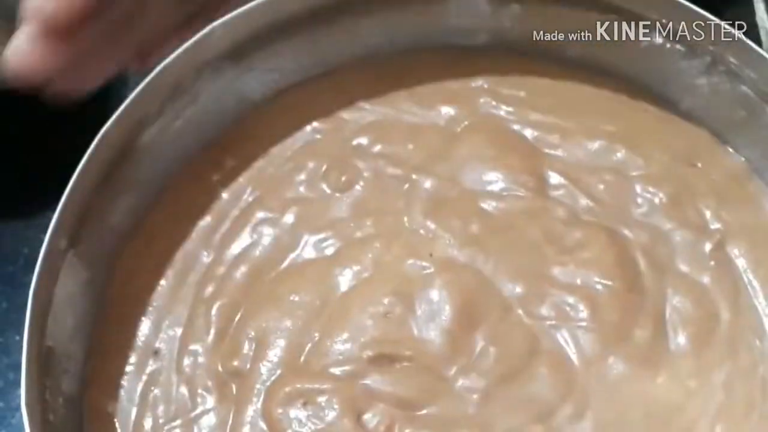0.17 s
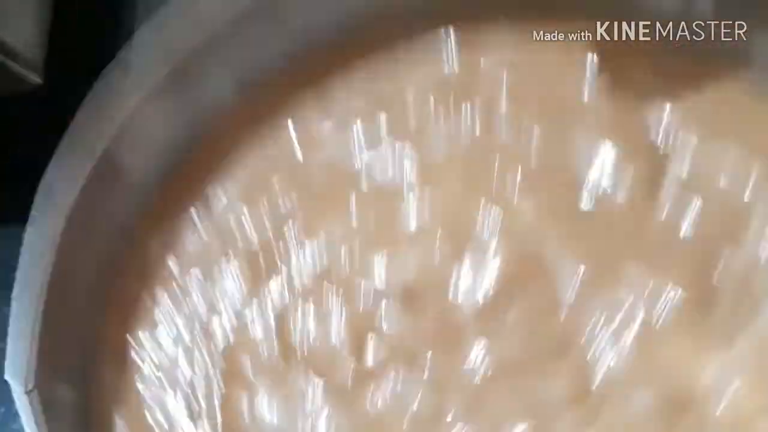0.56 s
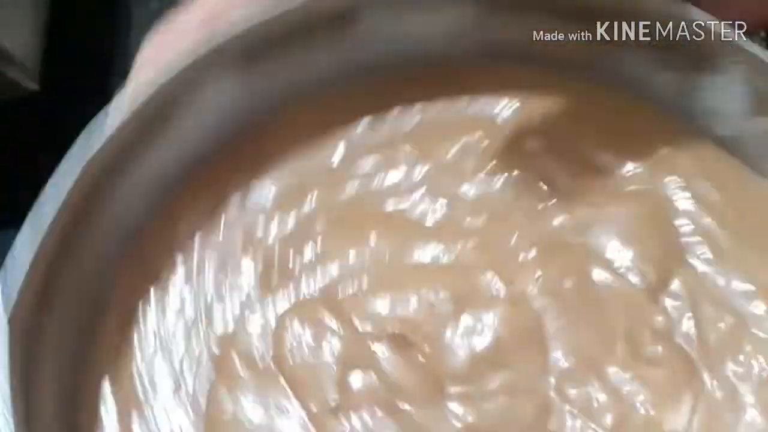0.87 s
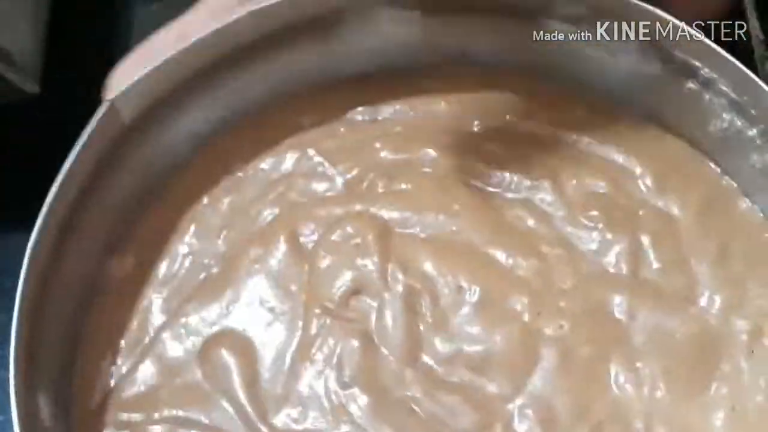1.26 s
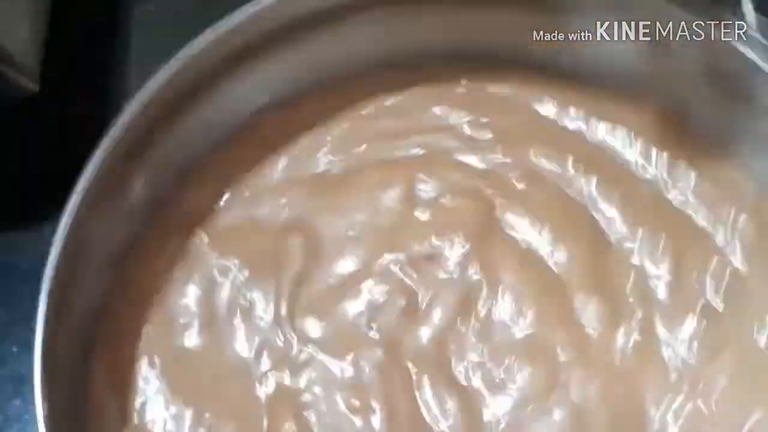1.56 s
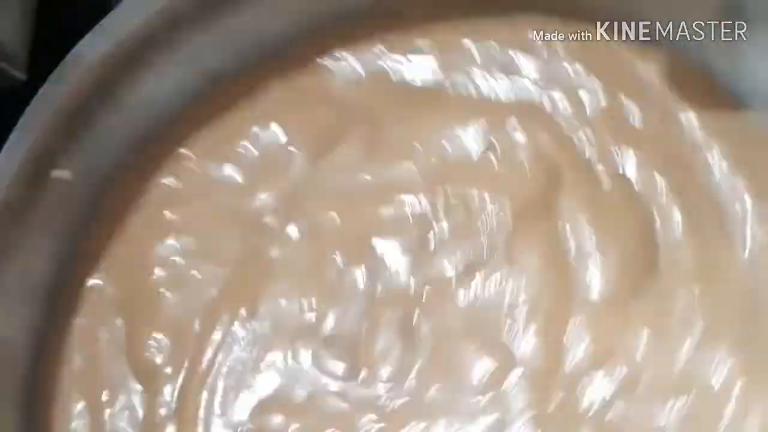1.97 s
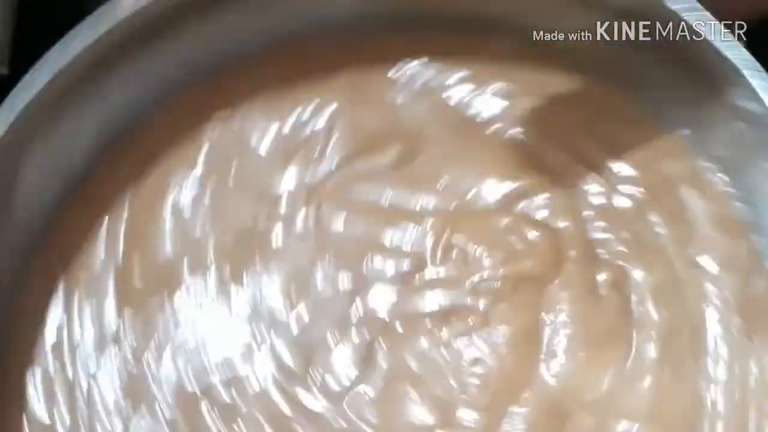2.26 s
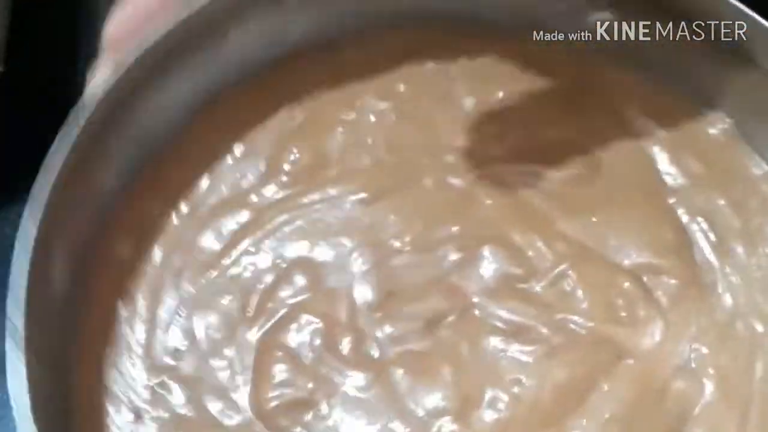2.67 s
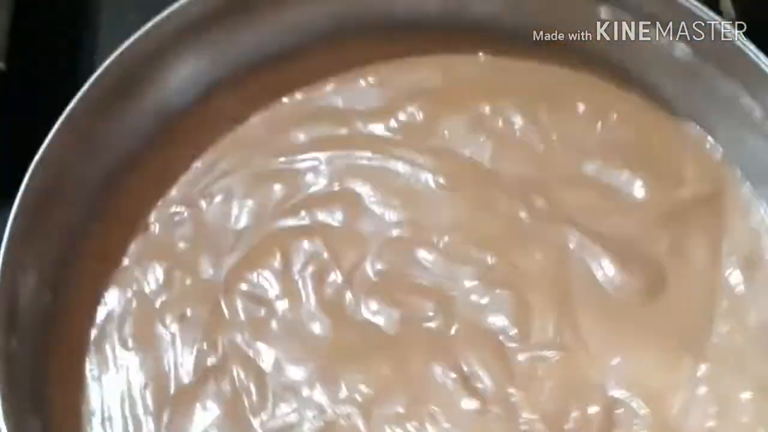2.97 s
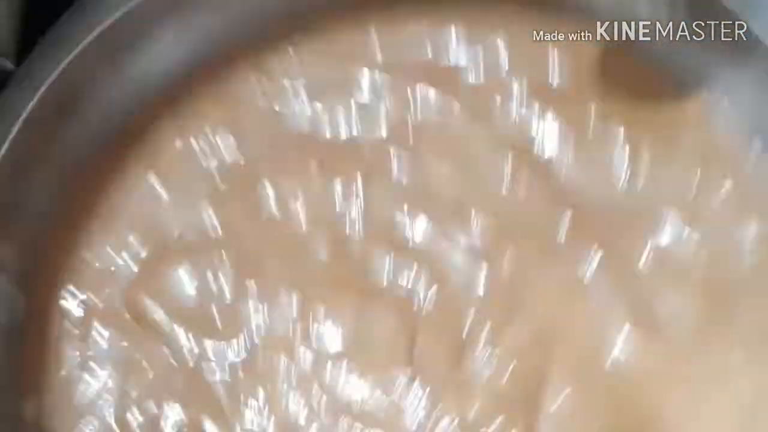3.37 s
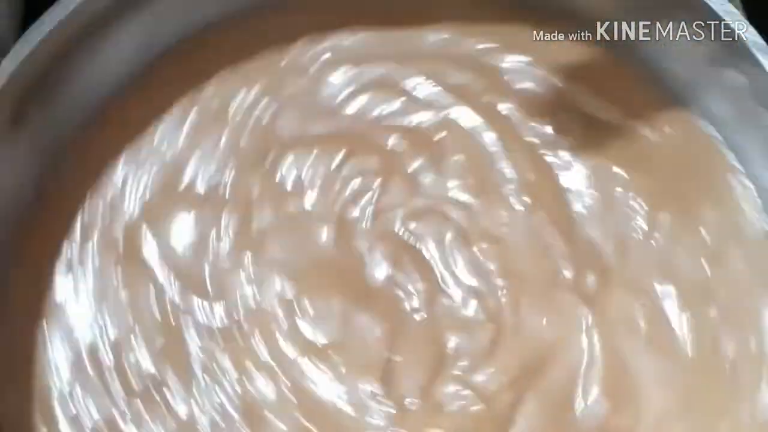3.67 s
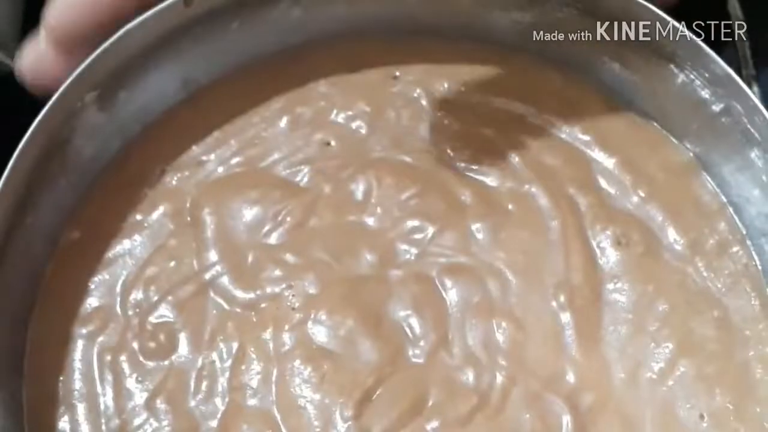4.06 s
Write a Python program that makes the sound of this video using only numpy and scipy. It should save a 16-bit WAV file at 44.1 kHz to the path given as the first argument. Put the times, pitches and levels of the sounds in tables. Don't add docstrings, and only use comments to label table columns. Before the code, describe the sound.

Close up, a steel pan full of batter is dropped on a hard counter eight times, roughly twice a second. Each drop starts with a sharp metallic clack and very short ring, then the heavy base slaps down and rocks in a few dull, low thuds. Small faint crackles come as the pan is lifted. The small, hard kitchen rings on briefly over a very quiet low murmur.

```python
import sys
import numpy as np
from scipy import signal
from scipy.fft import rfft, irfft
from scipy.io import wavfile
from scipy.ndimage import uniform_filter1d

SR = 44100
rng = np.random.default_rng(int(sys.argv[2]) if len(sys.argv) > 2 else 0)


def ratio(d):
    e = np.asarray(d, float) / 20
    return 10 ** e


def put_to_file(sound):
    columns = np.atleast_2d(sound).T
    safe = np.clip(columns, -1, 1)
    whole_steps = np.round(safe * 32767)
    wavfile.write(sys.argv[1], SR, whole_steps.astype(np.int16))


N = 186123
AGE = np.arange(4096) / SR

# [f/Hz, level/dB]
MURMUR_COLOUR = [(15, -46.5), (25, -25), (87, -9), (124, -15), (349, -9.5), (433, -2.5), (524, -16),
                 (878, -19), (1120, -18.5), (4360, -34.5), (7600, -33.5), (8800, -31.5), (14800, -46),
                 (16500, -68)]
MURMUR_DB = -54.5

# [t/s, level/dB, length/s]
LIFTS = [(0.0505, -26.5, 0.01), (0.49, -32, 0.005), (0.533, -30, 0.005), (0.642, -27, 0.0093),
         (1.1192, -24.5, 0.0058), (1.589, -24, 0.0068), (2.03, -31, 0.0055), (2.477, -28.5, 0.0061),
         (2.94, -30.5, 0.0089), (2.956, -34.5, 0.0058), (3.41, -38.5, 0.007)]
# [f/Hz, level/dB]
PEEL_COLOUR = [(1500, -10.5), (3500, 0), (5000, -4.5), (8000, -0.5), (11000, -7.5), (16000, -27)]

# [f/Hz, level/dB, t60/s]
ROOM_RINGING = [(39.5, -62.5, 0.2), (85.9, -20, 0.77), (155.5, -38, 0.44), (228, -18.5, 0.74),
                (334, -30.5, 0.5), (450, -30, 0.68), (657, -28, 0.55), (1140, -17.5, 0.51),
                (2160, -23, 0.58), (3120, -24.5, 0.56), (3800, -23, 0.39), (4660, -25.5, 0.62),
                (8600, -22.5, 0.44), (14840, -23, 0.31)]
# [f/Hz, level/dB, t60/s]
COUNTER_TONES = [(138.3, -43.5, 0.49), (211.8, -32, 0.23), (240, -33, 0.28), (387, -36, 0.28),
                 (445, -32.5, 0.36), (586, -34.5, 0.32), (677, -37, 0.2), (972, -29, 0.28),
                 (1400, -25, 0.095)]
# [f/Hz, rise/s]
BUILD_UP = [(200, 0.0017), (1500, 0.0045), (8000, 0.0067)]
# [f/Hz, level/dB]
THUD_PUSH = [(40, -13.5), (100, -16.5), (170, -6), (230, -1.5), (330, 2.5), (450, -4.5), (600, -8.5),
             (900, -18), (3000, -48)]
# [f/Hz, level/dB]
UPPER_TONE_PUSH = [(1000, -29.5), (1900, -2.5), (2400, 0), (3300, -2.5), (4500, -26)]

# [t/s, level/dB, f/Hz]
ROCKS = [(0.056, -32.5, 360), (0.075, -30, 304), (0.438, -24, 270), (0.488, -16, 280), (0.51, -16, 349),
         (0.52, -13, 357), (0.531, -17, 240), (0.932, -6.5, 316), (0.943, -20, 320), (0.967, -12.5, 301),
         (1.125, -24.5, 254), (1.397, -6, 268), (1.447, -15.5, 378), (1.847, -3, 252), (2.292, -5, 299),
         (2.758, -9.5, 293), (2.789, -9, 275), (2.802, -14, 257), (2.84, -19.5, 290), (2.955, -21.5, 304),
         (3.231, -12, 266), (3.249, -19, 277), (3.278, -24.5, 420), (3.703, -18.5, 276)]
# [t/s, wall ring level/dB, wall ring f/Hz, thud level/dB, thud f/Hz]
REBOUNDS = [(0.0640, -43, 1000, -22.5, 293), (0.0839, -44, 1030, -24.5, 309),
            (0.414, -25.5, 1910, 2, 283.4), (0.432, -34, 2220, -9.5, 430), (0.463, -25.5, 1500, -9, 278),
            (0.4990, -21.5, 1280, -13, 326), (0.9180, -21.5, 1350, -6.5, 279),
            (0.9238, -25.5, 1006, -25, 286), (1.3830, -19, 994, -6.5, 392), (1.4020, -28, 1120, -6.5, 294),
            (1.4270, -33.5, 2260, -17, 362), (1.8391, -17.5, 1480, -7.5, 292),
            (1.8654, -45, 810, -12.5, 331), (1.8955, -31, 1015, -9, 314), (2.2801, -19, 972, -6, 233),
            (2.3137, -41.5, 1890, -11, 313), (2.3271, -36.5, 1960, -13.5, 378),
            (2.7387, -20, 950, -2.5, 257), (2.7700, -32, 1060, -21, 310), (3.2079, -20, 1280, -4, 366),
            (3.2236, -26, 1470, -12, 288), (3.261, -30.5, 1070, -13, 329), (3.6606, -22, 1500, -9.5, 369),
            (3.6820, -27.5, 1400, -10.5, 304)]
# [t/s, wall ring level/dB, wall ring f/Hz, upper tone level/dB, thud level/dB]
LANDINGS = [
    (0.4079, -16, 1400, -15, -5.5),
    (0.8889, -20.5, 1715, -13.5, -4.5),
    (1.3701, -13.5, 1480, -12.5, -8),
    (1.8162, -18.5, 1315, -41, -5),
    (2.2611, -20.5, 1490, -10.5, -6.5),
    (2.7127, -15, 1564, -10, -3),
    (3.1973, -18, 1540, -20, -1),
    (3.6437, -14.5, 1475, -16.5, -4.5),
]
LANDING_THUD_HZ, LANDING_T60_S, LANDING_T60_GAIN_PER_DB = 333.4, 0.018, 0.23
THUD_T60_S = 0.053

# [f/Hz, level/dB]
CRACK_COLOUR = [(2000, -2.5), (3500, -1.5), (5000, -9.5), (7000, -5.5), (8800, -3.5), (10500, -8.5),
                (13000, -18), (16000, -33)]
# [f/Hz, level/dB]
KNOCK_COLOUR = [(250, -33.5), (600, -2.5), (1000, -1.5), (1500, 1), (2200, -5.5), (3200, -12),
                (4000, -15.5), (8000, -29)]
# [f/Hz, level against the stronger ring/dB]
HIGH_TONES = [(2950, -1.5), (3620, -5.5)]
UPPER_TONE_HZ = 2197
RING_T60_S, CRACK_T60_S = 0.012, 0.016
RING_LAG_S, CRACK_LAG_S = 0.000837, 0.0006
HARD_REBOUND_DB, HARD_CRACK_DB, CRACK_GROWTH = -20, -15.5, 1.47
SECOND_TONE_HZ, SECOND_SCATTER, SECOND_TONE_DB = 1750, 0.08, -26.5

# [f/Hz, level/dB]
MIC_COLOUR = [(20, -32.5), (60, -5), (150, 0), (2200, 1), (3250, 0.5), (3700, 0), (6500, -0.5),
              (8000, -2.5), (8900, -0.5), (9500, -7), (12000, 0.5)]
TOP_HZ, CEILING = 15500, 0.97


def fade(t, t60):
    return np.exp(-np.log(1000) * t / np.maximum(t60, 1e-3))


def colour(x, points):
    hz, db = np.transpose(points)
    f = np.maximum(np.fft.rfftfreq(8192, 1 / SR), 1)
    level_db = np.interp(np.log(f), np.log(hz), db)
    cepstrum = irfft(np.log(ratio(level_db)))
    cepstrum[1:4096] *= 2
    response = irfft(np.exp(rfft(cepstrum[:4096], 8192)))
    return signal.fftconvolve(x, response)[:len(x)]


def add(out, s, sound):
    i = int(s * SR)
    out[i:i + len(sound)] += sound[:N - i]


def grow(push_s):
    return 1 - np.exp(-AGE / push_s)


def ring(hz, t60, push_s):
    return np.sin(2 * np.pi * hz * AGE) * fade(AGE, t60) * grow(push_s)


def kitchen():
    noise = colour(rng.standard_normal(N), MURMUR_COLOUR)
    k = SR // 6
    steps = np.repeat(rng.standard_normal(N // k + 1), k)
    swell_db = 0.8 * uniform_filter1d(steps, k)[:N]
    return noise / noise.std() * ratio(MURMUR_DB + swell_db)


def peel():
    out = np.zeros(N)
    for s, db, length in LIFTS:
        chance = rng.standard_normal((2, len(AGE)))
        snaps = chance[0] * ratio(0.72 * chance[1]) * grow(0.0011)
        add(out, s, ratio(db - 5) * snaps * np.exp(-(AGE / max(length, 1e-3)) ** 2))
    return colour(out, [(300, -17)] + PEEL_COLOUR)


def blows(s, gain, points):
    shoves = np.zeros(N)
    sign = rng.choice([-1, 1], len(s))
    np.add.at(shoves, (np.asarray(s) * SR).astype(int), gain * sign)
    return colour(shoves, points)


def shaking():
    s, crack_db, low_db, _, up_db, _ = np.transpose(rim_contacts())
    thud_s, thud_db = np.transpose(thuds())[:2]
    lift_s, lift_db = np.transpose(LIFTS)[:2]
    force = blows(s, ratio(crack_db + 16.5), [(300, -65.5)] + CRACK_COLOUR)
    force += blows(s, ratio(28) * np.hypot(ratio(low_db), ratio(up_db)), KNOCK_COLOUR)
    force += colour(blows(s, ratio(up_db + 25.5), UPPER_TONE_PUSH), UPPER_TONE_PUSH)
    force += blows(lift_s, ratio(lift_db + 7.5), [(300, -38.5)] + PEEL_COLOUR)
    return force + blows(thud_s, ratio(thud_db + 34.5), THUD_PUSH)


def surroundings(force):
    t = np.arange(SR) / SR
    hz, db, t60 = np.transpose(ROOM_RINGING)
    rise_hz, rise_s = np.transpose(BUILD_UP)
    noise = rfft(rng.standard_normal(SR))
    octave = np.log2(np.maximum(np.arange(len(noise)), 1))
    response = np.zeros(SR)
    for centre in np.arange(5, 14.6, 0.5):
        band = irfft(noise * np.maximum(1 - 2 * abs(octave - centre), 0), SR)
        gain_db = np.interp(centre, np.log2(hz), db)
        decay_s = np.interp(centre, np.log2(hz), t60)
        rise = np.interp(centre, np.log2(rise_hz), rise_s)
        build_up = 1 - np.exp(-(t / rise) ** 1.1)
        response += ratio(gain_db - 11) * band * fade(t, decay_s) * build_up
    for f, level_db, ring_s in COUNTER_TONES:
        response += ratio(level_db - 18.5) * np.sin(2 * np.pi * f * t) * fade(t, ring_s)
    return signal.fftconvolve(force, response)[:N]


def thuds():
    first = [(s, db, LANDING_THUD_HZ, LANDING_T60_S * (1 - LANDING_T60_GAIN_PER_DB * db))
             for s, *_, db in LANDINGS]
    later = [(s, db, hz) for s, _, _, db, hz in REBOUNDS] + ROCKS
    return first + [(s, db, hz, THUD_T60_S) for s, db, hz in later]


def base():
    out = np.zeros(N)
    for s, db, hz, t60 in thuds():
        thud = -ring(hz, 3.6 * t60, push_s=0.0027)
        thud += ratio(-7.5) * ring(1.46 * hz, 0.39 * t60, push_s=0.0015)
        thud += ratio(-14.5) * ring(2.08 * hz, 0.69 * t60, push_s=0.00056)
        thud *= np.exp(-(AGE / (0.2 * t60)) ** 2)
        thud += ratio(-31) * ring(75, 0.045, push_s=0.006)
        add(out, s + 0.00072, ratio(db + 1.5) * thud)
    return out


def slap():
    out = np.zeros(N)
    for s, db, _, t60 in thuds():
        sizzle = rng.standard_normal(len(AGE)) * fade(AGE, t60) * grow(0.002)
        add(out, s, ratio(0.88 * db - 20) * sizzle)
    return colour(out, [(300, -54)] + CRACK_COLOUR)


def rim_contacts():
    contacts = []
    for s, db, hz, up_db, _ in LANDINGS:
        crack_db = 20 * np.log10(np.hypot(ratio(db), ratio(up_db)))
        contacts.append((s, crack_db, db, hz, up_db, UPPER_TONE_HZ))
    scatter = 1 + SECOND_SCATTER * rng.standard_normal(len(REBOUNDS))
    for (s, db, hz, _, _), k in zip(REBOUNDS, scatter):
        growth_db = CRACK_GROWTH * (db - HARD_REBOUND_DB)
        contacts.append((s, HARD_CRACK_DB + growth_db, db, hz,
                         SECOND_TONE_DB + growth_db, SECOND_TONE_HZ * k))
    return contacts


def rim():
    crack, knock, rings = np.zeros((3, N))
    for s, crack_db, low_db, low_hz, up_db, up_hz in rim_contacts():
        noise = rng.standard_normal((2, len(AGE))) * grow(0.00021)
        knock_gain = ratio(12.5) * np.hypot(ratio(low_db), ratio(up_db))
        add(crack, s + CRACK_LAG_S, ratio(crack_db + 4.5) * noise[0] * fade(AGE, CRACK_T60_S))
        add(knock, s + CRACK_LAG_S, knock_gain * noise[1] * fade(AGE, 0.022))
        add(rings, s + RING_LAG_S, ratio(low_db + 15) * ring(low_hz, RING_T60_S, push_s=0.00029))
        add(rings, s + RING_LAG_S, ratio(up_db + 6.5) * ring(up_hz, RING_T60_S, push_s=0.00022))
    return colour(crack, [(300, -5)] + CRACK_COLOUR) + colour(knock, KNOCK_COLOUR) + rings


def high_tones():
    out = np.zeros(N)
    for s, db, _, up_db, _ in LANDINGS:
        for hz, below_db in HIGH_TONES:
            gain = ratio(max(db, up_db) + below_db)
            add(out, s + RING_LAG_S, gain * ring(hz, RING_T60_S, push_s=0.0003))
    return out


def scene():
    pan = peel() + base() + slap() + rim() + high_tones()
    return (kitchen() + pan + surroundings(shaking()))[None]


def top_cut(x):
    return signal.sosfilt(signal.butter(12, 16830, fs=SR, output="sos"), x)


def record(dry):
    soft = np.tanh(0.84 * colour(dry[0], MIC_COLOUR)[None]) / 0.74
    low_pass = signal.ellip(8, 0.2, 45, TOP_HZ, fs=SR, output="sos")
    soft = signal.sosfilt(low_pass, soft)
    soft = CEILING * np.tanh((abs(soft) / CEILING) ** 4) ** 0.25 * np.sign(soft)
    return top_cut(soft)


dry = scene()
out = record(dry)
put_to_file(out)
```